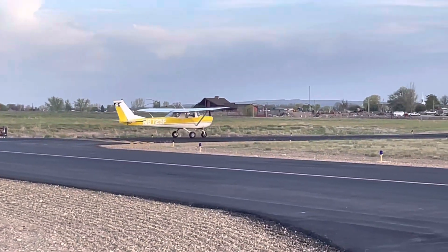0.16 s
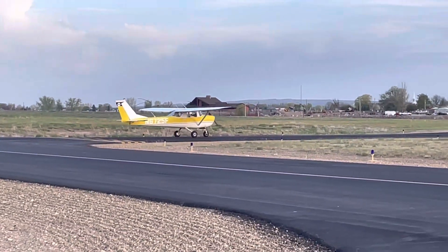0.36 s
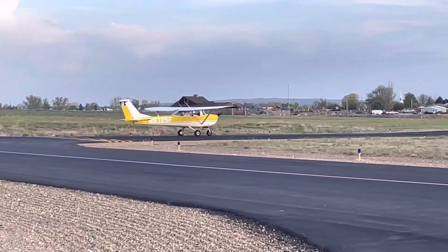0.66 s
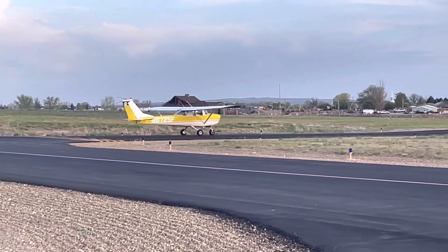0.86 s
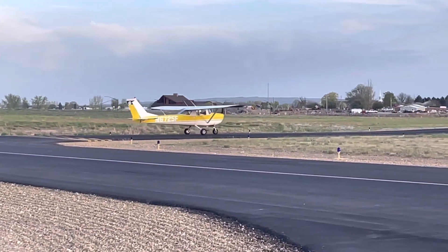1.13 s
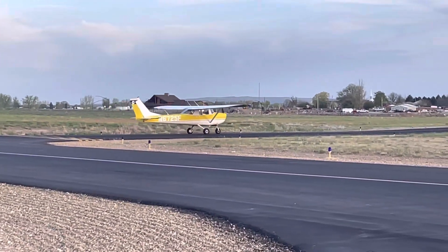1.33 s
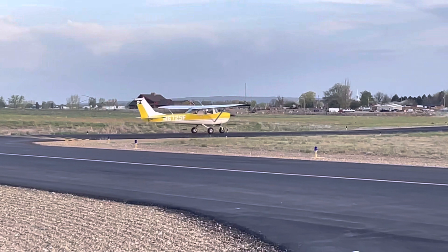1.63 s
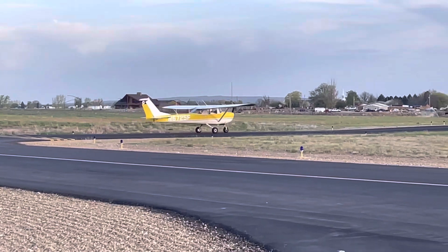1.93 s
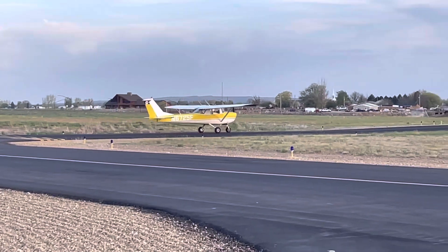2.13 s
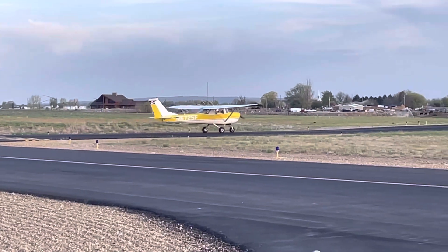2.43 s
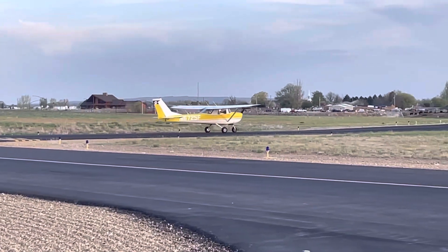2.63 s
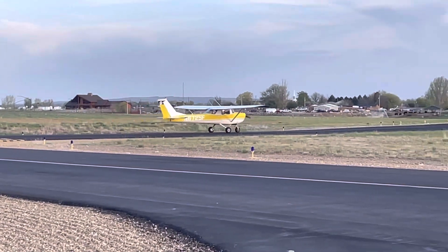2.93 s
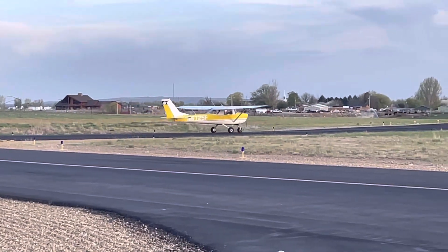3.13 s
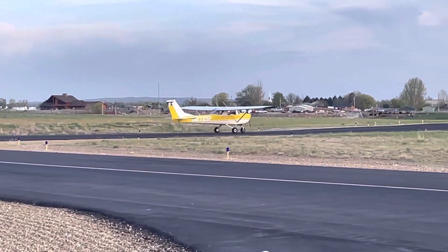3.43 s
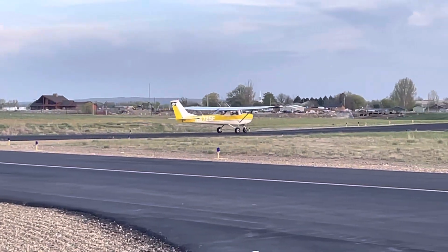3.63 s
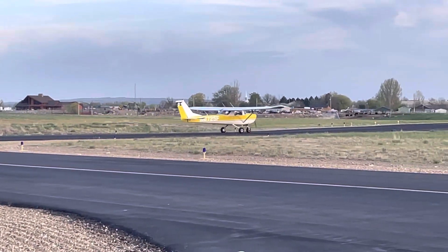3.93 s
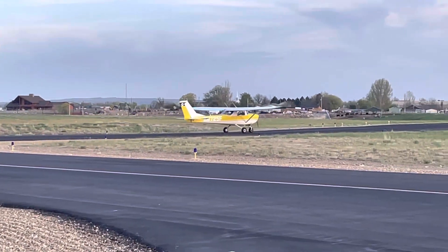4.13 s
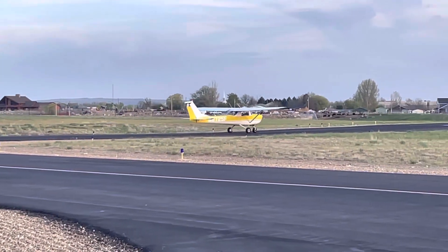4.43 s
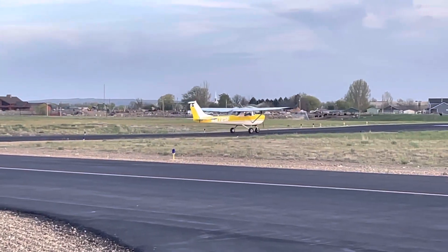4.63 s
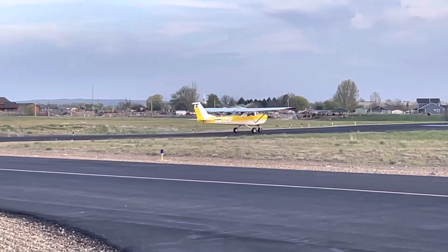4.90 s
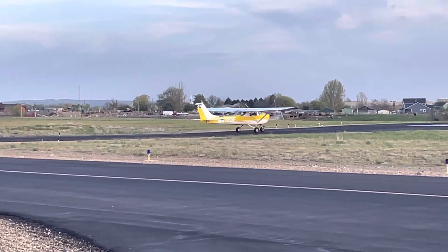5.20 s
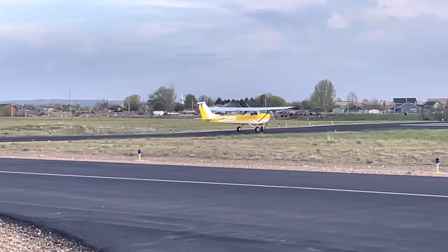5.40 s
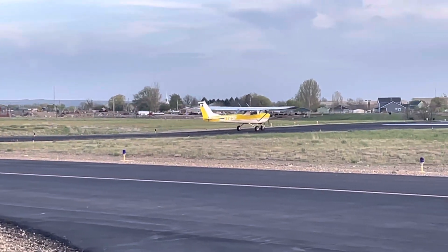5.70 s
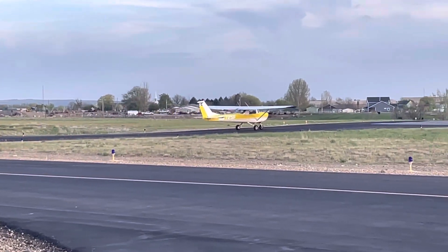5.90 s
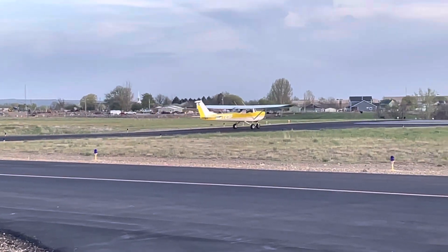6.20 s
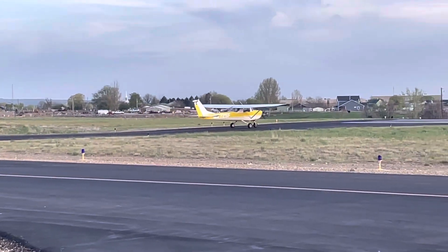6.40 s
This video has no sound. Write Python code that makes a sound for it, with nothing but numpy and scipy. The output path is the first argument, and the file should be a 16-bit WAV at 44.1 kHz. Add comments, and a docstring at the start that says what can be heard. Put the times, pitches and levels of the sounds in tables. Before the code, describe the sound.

Outdoors on an open airfield, a small single-engine propeller plane taxis past at a distance. A low steady drone throbs under a rapidly beating hiss with faint valve clatter. After about three seconds the revs sink, the hiss fades and dulls, and the drone wavers. Low wind bumps strike the stereo microphone, over a soft, hollow roar.

```python
"""A low engine drone runs throughout, under a beating hiss: a small propeller airplane rolls past across
a runway and turns its tail. Its revs sink; the drone is a sum of sines locked to the engine beat.
The exhaust and blades chop noise into a hiss that swells once a beat, with valve clatter inside it.
Unsteady low noise makes an engine rumble, and the airfield gives back a dull roar of noise.
Wind flutters and pops on the two microphone ports."""
import sys
import numpy as np
from scipy import signal
from scipy.fft import rfft, irfft, next_fast_len
from scipy.io import wavfile
from scipy.ndimage import uniform_filter1d, map_coordinates

SR = 44100
rng = np.random.default_rng(int(sys.argv[2]) if len(sys.argv) > 2 else 0)


def magnitude_from_level(level_db):
    """Linear magnitude for a level in decibels (20 dB per decade)."""
    exponent = np.asarray(level_db, float) / 20
    return 10 ** exponent


def store_pcm(level_fs):
    """Save levels as 16-bit WAV."""
    pcm = np.round(np.clip(level_fs, -1, 1) * 32767).astype(np.int16)
    wavfile.write(sys.argv[1], SR, np.atleast_2d(pcm).T)


N = 288855  # length in samples

# Engine beat as the revs sink. Columns: time_s, beat_hz
ENGINE_BEAT = [(0, 48.46), (2.5, 48.46), (3, 47.45), (3.3, 46.2), (3.6, 46), (3.9, 45.6), (4.25, 44.9),
               (4.5, 43.7), (5, 42.9), (5.7, 42.45), (6.55, 42.05)]
# The two strongest engine orders, before lean and flutter. Columns: time_s, second_order_db, third_order_db
DRONE_LEVELS = [(0, -25.5, -33.5), (0.3, -25, -32), (2.55, -25.5, -33.5), (2.78, -32.5, -34), (3, -24, -37),
                (3.2, -29, -37), (3.29, -34.5, -37), (3.5, -22.5, -33), (3.65, -33, -32.5),
                (3.75, -27.5, -34), (4.1, -26.5, -33), (4.25, -38, -45), (4.42, -47.5, -48.5),
                (4.7, -34, -44.5), (4.88, -35, -46), (5, -30, -44), (5.1, -36, -42.5), (5.22, -27.5, -45.5),
                (5.38, -36.5, -43.5), (5.58, -29.5, -37.5), (5.9, -29, -36), (6.02, -35, -47),
                (6.22, -34.5, -47), (6.32, -24, -37.5), (6.55, -30, -43)]
# Weaker orders, before fading; the four cylinders differ, so quarter orders sound too.
# Columns: multiple_of_beat, level_against_third_order_db
WEAK_ORDERS = [(1, -14), (1.5, -10), (1.748, -5), (2.25, -12), (2.5, -7), (2.75, -13), (3.25, -17),
               (3.5, -22), (3.751, -18), (4, -15), (4.25, -19.5), (4.5, -27.5), (4.75, -25.5), (5, -23.5),
               (5.25, -31), (5.5, -30), (5.75, -31), (6, -22), (6.25, -29.5), (7, -38.5)]
# Slow drift of the drone's left-right level and phase; the right stays slightly louder.
# Columns: time_s, left_over_right_db, left_lead_rad
DRONE_LEAN = [(0, -1.7, 0.045), (3, -1, 0.29), (3.9, -4, 0.81), (5.2, -2, 0.87), (6.55, -0.5, 0.55)]
# Gain of the chopped hiss, before flicker and colour. Columns: time_s, low_band_db, middle_band_db, high_band_db
BLAST_LEVELS = [(0, -50.5, -49, -54.5), (0.3, -48, -53.5, -52.5), (0.55, -49, -49.5, -53.5),
                (0.83, -47.5, -44.5, -45.5), (1.05, -47.5, -48, -51), (1.55, -52.5, -52, -53),
                (1.8, -52.5, -57.5, -60.5), (2, -52.5, -58.5, -60.5), (2.17, -55.5, -58, -69.5),
                (2.45, -56, -61.5, -63), (2.72, -57, -63.5, -65), (3.05, -58.5, -54.5, -64),
                (3.35, -55.5, -60.5, -68.5), (3.55, -63.5, -71.5, -68), (3.8, -71, -66, -75),
                (4.35, -71.5, -73.5, -76.5), (4.55, -58.5, -75.5, -73), (4.799, -76, -64, -73.5),
                (5.07, -66, -77.5, -79), (5.35, -63, -78.5, -79), (5.6, -67.5, -68, -80),
                (5.88, -68.5, -73, -83), (6.2, -59, -65.5, -77), (6.37, -57.5, -69, -72.5),
                (6.55, -61.5, -62, -74)]
# Centres of those three bands. Column: centre_hz
BAND_CENTRES = [1300, 2600, 5300]
# How strongly moving air makes each band flicker. Column: flicker_db (low, middle, high)
BAND_FLICKER = [0.7, 0.67, 2]
# Fixed colour of the hiss, a gain on white noise. Columns: frequency_hz, gain_db
BLAST_COLOUR = [(300, -18), (500, 6), (720, 11), (1000, 10.5), (1150, 12), (1400, 14.5), (1950, 14),
                (2200, 7), (2400, 11), (3500, 10.5), (3900, 7), (5000, 9.5), (7000, 0.5), (10000, -5),
                (11800, -8.5), (12300, -33)]
# Bright band moving through the hiss. Columns: time_s, centre_hz, boost_db
BRIGHT_BAND = [(0, 2190, 5), (2.7, 2170, 1), (3.05, 1970, 7.5), (3.3, 2100, 3.5), (4.55, 1950, 2.5),
               (4.8, 2400, -4.5), (5.2, 1970, 6), (5.5, 1940, 7.5), (5.75, 2760, 6.5), (5.95, 1990, 1.5),
               (6.55, 1960, 2.5)]
# Steady rush between the beats. Columns: time_s, share_of_a_swell (0-1)
STEADY_RUSH = [(0, 0.69), (2, 0.95), (3, 0.52), (3.7, 0.91), (5.5, 0.65), (6.55, 0.49)]
# Each cylinder's swell in the hiss. Column: level_db
CYLINDER_LEVELS = [0.89, -0.88, -0.11, -0.6]
# Valve clatter repeats every four beats, so it sings on quarter orders. Column: multiple_of_beat
CLATTER_ORDERS = [12.75, 13.25, 14.25, 14.5, 16, 16.25, 19.75, 21.75, 22.75, 23.5, 23.75, 24.5, 28, 28.75,
                  29, 30, 32, 33.5]
# Peak of each clatter sine against the hiss, before wobble. Column: level_db
CLATTER_LEVELS = [-29, -32.5, -25.5, -26.5, -26, -24.5, -27, -29.5, -28.5, -27, -26, -28.5, -30, -28.5, -40,
                  -31, -32.5, -30.5]
# How alike left and right are in the hiss; at 1 both sides get the same noise, as in a narrow
# joined stretch near 8 kHz. Columns: frequency_hz, likeness (0-1)
BLAST_ALIKE = [(500, .7), (800, .93), (1500, .96), (2000, .97), (2400, .995), (3200, 1), (6100, 1),
               (6400, .9), (7600, .92), (8000, 1), (8700, 1), (9200, .9), (10500, .97), (11000, 1)]

# Engine rumble and wind flutter, before the two layer gains below. Columns: time_s, rumble_db, flutter_db
LOW_LEVELS = [(0, -33.5, -40), (0.55, -39, -44), (0.9, -33, -45), (2.7, -35, -44.5), (3.25, -34.5, -59),
              (3.62, -33.5, -53), (3.85, -39, -45.5), (4, -36.5, -45.5), (4.2, -43.5, -52),
              (4.5, -45, -50.5), (5.3, -41.5, -49), (6.55, -41.5, -50)]
# Relative colour of the low engine rumble, strongest around 45-105 Hz. Columns: frequency_hz, gain_db
RUMBLE_COLOUR = [(15, -41.5), (28, -17.5), (45, 2), (65, 10), (105, 9), (150, -2), (200, -8.5), (300, -68)]
# Relative colour of the wind flutter. Columns: frequency_hz, gain_db
FLUTTER_COLOUR = [(100, -19.5), (170, 5.5), (265, -3.5), (350, -12), (450, -26), (600, -72.5)]
# Left-right likeness of the rumble and the flutter. Columns: frequency_hz, likeness (0-1)
LOW_ALIKE = [(30, 0.59), (100, 0.11), (270, 0.1)]
# Wind pops. Columns: start_s, burst_level_db, push_over_burst_db
WIND_POPS = [(3.223, -38.5, -3), (3.374, -40, 1), (3.62, -19.5, 2.5), (4.02, -33, -3), (4.19, -31, -2),
             (4.217, -34.5, 5), (4.306, -38.5, 1), (4.397, -34.5, -6.5), (4.438, -35.5, -8),
             (4.594, -37.5, -3.5), (4.997, -40, -5.5), (5.288, -37, 4.5), (5.791, -39.5, -1),
             (5.925, -36.5, -6), (6.501, -29.5, 4.5)]
# Relative colour of a pop's burst. Columns: frequency_hz, gain_db
POP_COLOUR = [(40, -20.5), (110, -2.5), (220, 6.5), (300, -4.5), (370, -10), (450, -27), (600, -72.5)]

# Level of the diffuse roar. Columns: time_s, level_db
FIELD_LEVEL = [(0, -54), (0.85, -56.5), (1.3, -56), (2.3, -55), (3.25, -56), (3.65, -51), (4.1, -52.5),
               (4.5, -48.5), (5.35, -56), (5.8, -52.5), (6.1, -55.5), (6.55, -53)]
# Relative colour of the roar. Columns: frequency_hz, gain_db
ROAR_COLOUR = [(210, -37.5), (350, -10), (600, -4), (1070, -10.5), (1640, -19.5), (3000, -37),
               (3900, -53.5), (6600, -120)]
# Hollow-sounding boosted band in the roar. Columns: time_s, centre_hz
HOLLOW_BAND = [(0, 700), (1.9, 682), (2.48, 620), (3.14, 669), (3.67, 549), (5.16, 560), (5.54, 630),
               (5.89, 590), (6.55, 596)]

# Phase between the microphone ports. Columns: frequency_hz, left_lead_turns
PORT_PHASE = [(1550, 0), (1880, -1), (6150, -1), (6500, -1.1), (7240, -1.23), (8000, -1.48), (8600, -1.52),
              (9200, -1.64), (11000, -2)]
# Housing dip of each port, left then right. Columns: centre_hz, width_hz, depth (0-1)
PORT_DIPS = [(1790, 240, 0.4), (1570, 190, 0.6)]
# Relative colour of the electronics' hiss. Columns: frequency_hz, gain_db
HISS_COLOUR = [(2000, -43), (3000, 8), (6000, -1.5), (10000, -33), (12000, -19.5), (12500, -50)]

WAVER_RAD = 0.13  # phase flutter of each order
# The pipe spreads the orders in time, high ones first, so the cycle does not arrive as one knock
SMEAR_RAD = 4.2
RISE_BEATS, FALL_BEATS = 0.13, 0.24  # width of a swell before and after its top
CRACK_SHARE, CRACK_BEATS = 0.37, 0.035  # sharp tick on top of each swell: share of it, and width
RUMBLE_GAIN_DB, FLUTTER_GAIN_DB = 7.5, 3  # added to the rumble and flutter levels
POP_SCALE_S = 0.01142  # time scale of every pop


def unit(x):
    """Scale x to rms 1."""
    return x / np.sqrt(np.mean(x ** 2) + 1e-20)


def along(points, hz):
    """Read a value off (frequency_hz, value) points on a log frequency axis."""
    f, v = np.transpose(points)
    return np.interp(np.log(hz + 1), np.log(f + 1), v)


def curves(rows):
    """Give one value per sample for each column after the time, with rounded corners."""
    s, *columns = np.transpose(rows)
    t = np.arange(N) / SR
    return [uniform_filter1d(np.interp(t, s, column), size=600) for column in columns]


def wobble(rate_hz):
    """Draw a smooth random curve with rate_hz random knots a second."""
    knots = rng.standard_normal(int(N * rate_hz / SR) + 4)
    return map_coordinates(knots, [np.arange(N) * rate_hz / SR])


def filtered(x, response):
    """Filter x by a complex response of frequency."""
    m = next_fast_len(N + SR // 2)
    return irfft(rfft(x, m) * response(np.fft.rfftfreq(m, 1 / SR)), m)[..., :N]


def coloured(x, spectrum):
    """Filter x through a (frequency_hz, gain_db) spectrum and scale it to rms 1."""
    return unit(filtered(x, lambda hz: magnitude_from_level(along(spectrum, hz))))


def pair(alike):
    """Make left and right noises that share a part, set by (frequency_hz, likeness) points."""
    def mid_side_gains(hz):
        angle = np.arccos(np.clip(along(alike, hz), -1, 1)) / 2
        return np.array([np.cos(angle), np.sin(angle)])

    mid, side = filtered(rng.standard_normal((2, N)), mid_side_gains)
    return np.array([mid + side, mid - side])


def patches(x, wide, long, patchy_db, gain_db=lambda hz, at: 0):
    """Put x under drifting patches of random gain, and a gain that moves with time and frequency."""
    hz, t, z = signal.stft(x, SR, nperseg=256)
    field = rng.standard_normal(z.shape[1:])
    # Smooth twice across frequency bins (wide) and time frames (long)
    for size, axis in ((wide, 0), (long, 1)) * 2:
        field = uniform_filter1d(field, size=size, axis=axis)
    at = np.minimum((t * SR).astype(int), N - 1)
    z = z * magnitude_from_level(gain_db(hz, at) + patchy_db * unit(field))
    return signal.istft(z, SR, nperseg=256)[1][:, :N]


def drone(beats):
    """Engine orders as sines; moving air makes each flutter, and the weaker ones fade as the tail turns."""
    second_db, third_db = curves(DRONE_LEVELS)
    lean_db, lead_rad = curves(DRONE_LEAN)
    fade_db = uniform_filter1d(curves(BLAST_LEVELS)[0], size=SR // 2)
    fade_db = fade_db - fade_db.max()
    side = np.array([[0.5], [-0.5]])  # left, right
    orders = [(2, second_db), (3, third_db)]
    orders += [(k, third_db + db + 0.13 * k * fade_db) for k, db in WEAK_ORDERS]
    total = 0
    for k, db in orders:
        level = magnitude_from_level(db + side * lean_db + 0.82 * wobble(13))
        waver = WAVER_RAD * wobble(10)
        smear = 0.96 * k + SMEAR_RAD * (k - 2) * (k - 3)
        phase = 2 * np.pi * k * beats + side * lead_rad + waver + smear
        total = total + np.sqrt(2) * level * np.sin(phase)
    return total


def beat_swells(beats):
    """The exhaust and blades chop the hiss: each beat swells quickly, ticks at its top and falls slowly."""
    beat = beats.astype(int)
    size_db, shift = rng.standard_normal((beat[-1] + 2, 2)).T
    past = beats % 1 - 0.47 + 0.026 * shift[beat]  # beats past the top of the swell
    top_db = 2.0 * size_db[beat] + np.take(CYLINDER_LEVELS, beat, mode="wrap")
    width = np.where(past < 0, RISE_BEATS, FALL_BEATS)
    hump = np.exp(-(past / width) ** 2)
    crack = CRACK_SHARE * np.exp(-(past / CRACK_BEATS) ** 2)
    return curves(STEADY_RUSH)[0] + magnitude_from_level(top_db) * (hump + crack)


def valve_clatter(beats):
    """Valve clatter as sines on quarter multiples of the beat, each wobbling in level and phase."""
    total = 0
    for k, db in zip(CLATTER_ORDERS, CLATTER_LEVELS):
        level = magnitude_from_level(db + 2.5 * wobble(3))
        total = total + level * np.sin(2 * np.pi * k * beats + 0.5 * wobble(3))
    return total


def blast(beats):
    """Hiss swelling once a beat over a steady rush and valve clatter; heading and air move its bands."""
    bands_db = np.array([db + flicker_db * wobble(12)
                         for db, flicker_db in zip(curves(BLAST_LEVELS), BAND_FLICKER)])
    bright_hz, bright_db = curves(BRIGHT_BAND)
    jet = unit(beat_swells(beats) * pair(BLAST_ALIKE)) + valve_clatter(beats)

    def gain_db(hz, at):
        """Band levels joined across frequency; air eats the top octave faster as the hiss recedes."""
        share = np.array([along(list(zip(BAND_CENTRES, row)), hz) for row in np.eye(3)]).T
        hz = hz[:, None]
        top_octave = np.clip(np.log2(hz / 7000 + 1e-9), 0, 1)
        loss_db = top_octave * 0.6 * (bands_db[2, at] - bands_db[2].max())
        bright = bright_db[at] * np.exp(-((hz - bright_hz[at]) / 300) ** 2)
        return share @ bands_db[:, at] + loss_db + bright

    moving = patches(jet, wide=4, long=24, patchy_db=1.1, gain_db=gain_db)
    return filtered(moving, lambda hz: magnitude_from_level(along(BLAST_COLOUR, hz)))


def rumble_and_flutter():
    """A low engine rumble and a higher wind flutter, both lumpy noise that differs from port to port."""
    rumble_db, flutter_db = curves(LOW_LEVELS)
    own_lumps = np.array([wobble(12), wobble(12)])
    lumps = magnitude_from_level(1.6 * own_lumps + 1.98 * wobble(5))
    rumble = unit(lumps * coloured(pair(LOW_ALIKE), RUMBLE_COLOUR))
    flutter = unit(lumps * coloured(pair(LOW_ALIKE), FLUTTER_COLOUR))
    return magnitude_from_level(rumble_db + RUMBLE_GAIN_DB) * rumble + magnitude_from_level(flutter_db + FLUTTER_GAIN_DB) * flutter


def pops():
    """An eddy strikes the ports: a blunt burst of low noise, then a low push sliding down in pitch."""
    t = np.arange(N) / SR
    burst, push = np.zeros((2, N))
    for start_s, db, push_db in WIND_POPS:
        u = (t - start_s) / POP_SCALE_S
        burst += magnitude_from_level(db) * np.exp(-((u - 0.4) / 1.12) ** 2)
        push_shape = magnitude_from_level(db + push_db) * np.exp(-((u - 1.6) / 0.86) ** 2)
        push += push_shape * np.sin(2 * np.pi * 4.56 * np.clip(u, 0, None) ** 0.27)
    noise = coloured(pair([(100, 0.76), (300, 0.24)]), POP_COLOUR)
    return burst * noise + push


def field_roar():
    """The field scatters a dull wavering roar: wide noise with a hollow band that drifts in pitch."""
    hollow_hz = curves(HOLLOW_BAND)[0]

    def hollow_db(hz, at):
        return 8 * np.exp(-((hz[:, None] - hollow_hz[at]) / 110) ** 2)

    noise = pair([(600, 0.45), (1200, 0.11), (2500, 0.19)])
    wavering = patches(noise, wide=2, long=40, patchy_db=2.0, gain_db=hollow_db)
    return magnitude_from_level(curves(FIELD_LEVEL)[0]) * coloured(wavering, ROAR_COLOUR)


def scene():
    """Add the airplane, the wind and the field; drone and hiss share one running count of beats."""
    beats = 0.82 + np.cumsum(curves(ENGINE_BEAT)[0]) / SR
    return drone(beats) + blast(beats) + rumble_and_flutter() + pops() + field_roar()


def ports(hz):
    """Each microphone port has its own dip, and their phases slide apart in the treble."""
    dips = [1 - np.clip(depth, 0, 1) / (1 + ((hz - centre) / width) ** 2 * 4) ** 2
            for centre, width, depth in PORT_DIPS]
    return dips * np.exp(1j * np.pi * along(PORT_PHASE, hz) * np.array([[1], [-1]]))


def roll_off(x):
    """The treble ends steeply here."""
    return signal.sosfilt(signal.butter(12, 12190, fs=SR, output="sos"), x)


def record(dry):
    """Add a faint hiss of the electronics and pass everything through the two microphone ports."""
    hiss = magnitude_from_level(-84) * coloured(pair(BLAST_ALIKE), HISS_COLOUR)
    mix = filtered(dry + hiss, ports)
    return roll_off(mix)


dry = scene()
out = record(dry)
store_pcm(out)
```